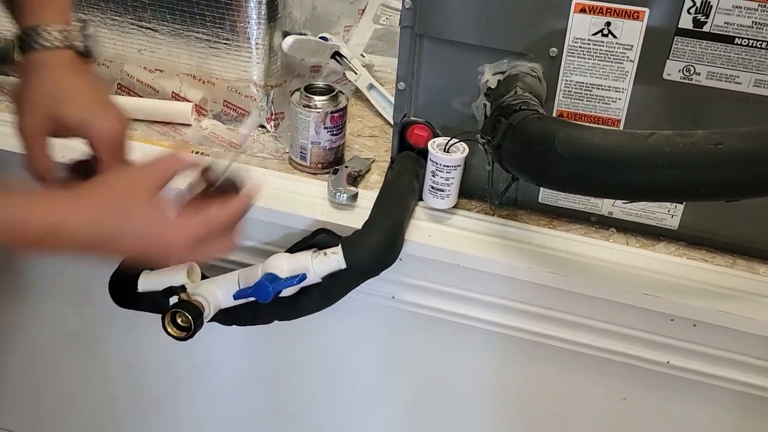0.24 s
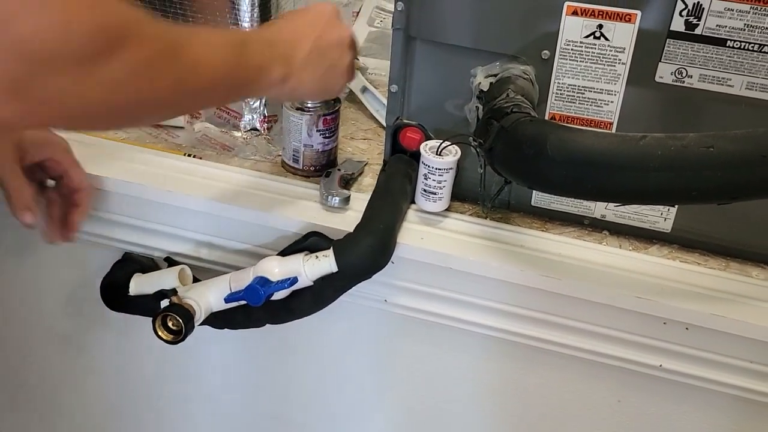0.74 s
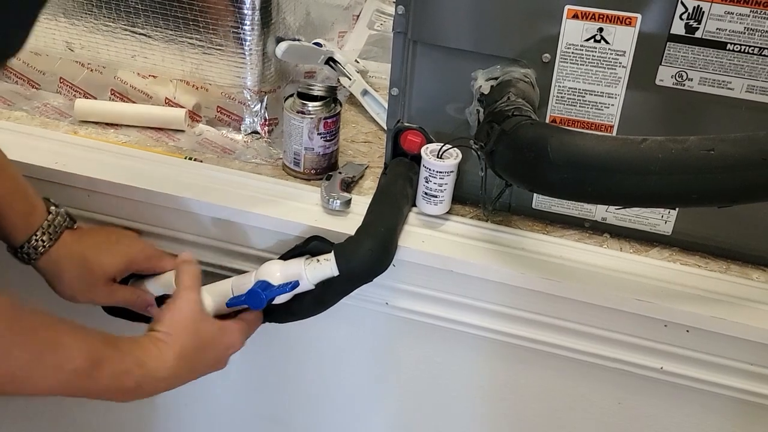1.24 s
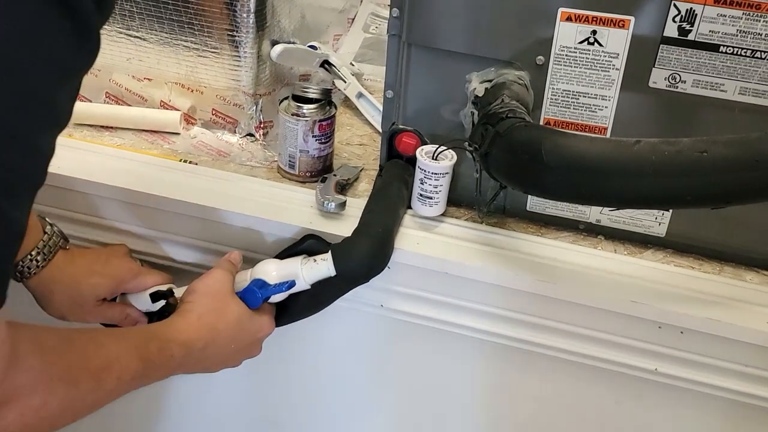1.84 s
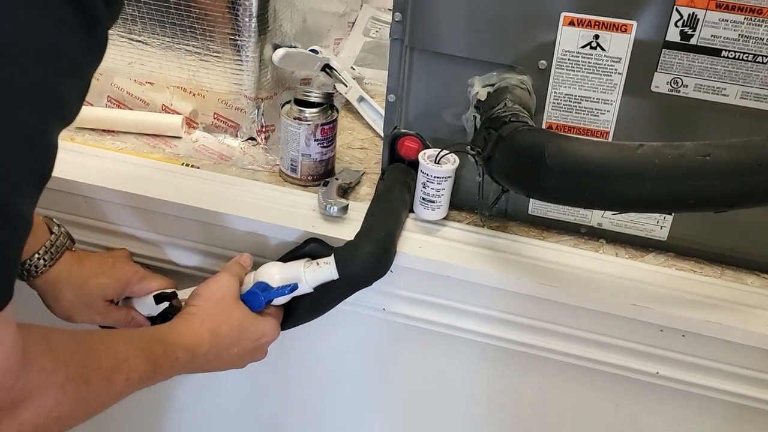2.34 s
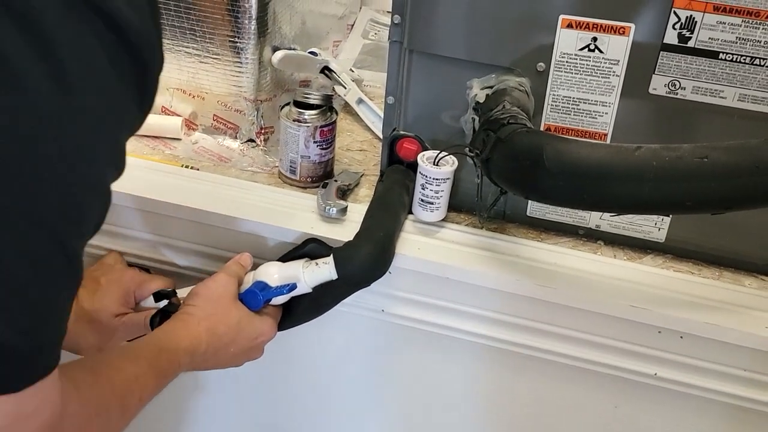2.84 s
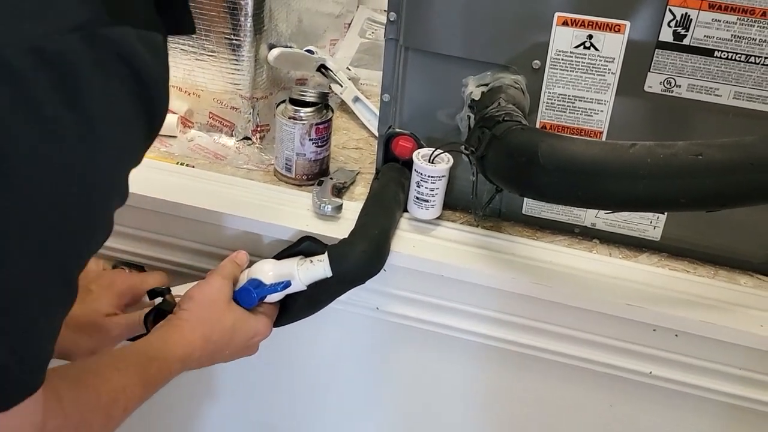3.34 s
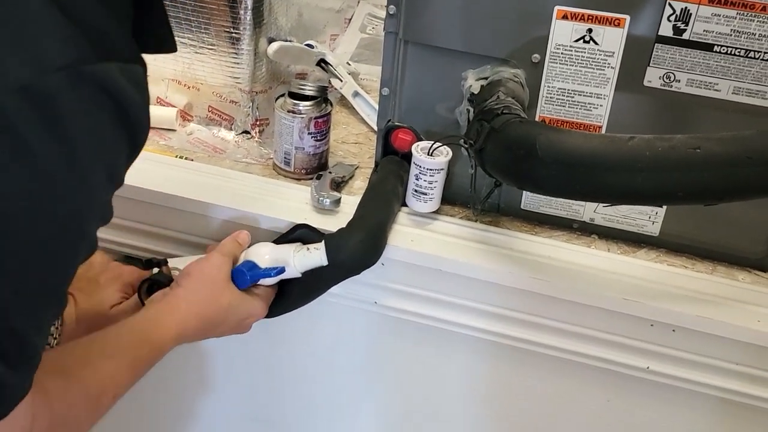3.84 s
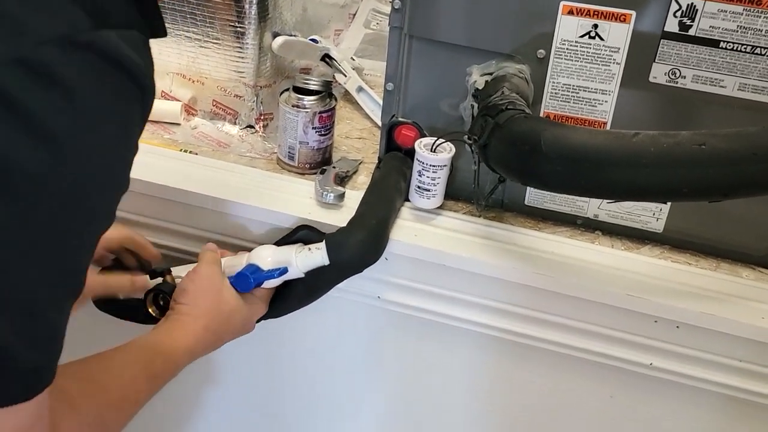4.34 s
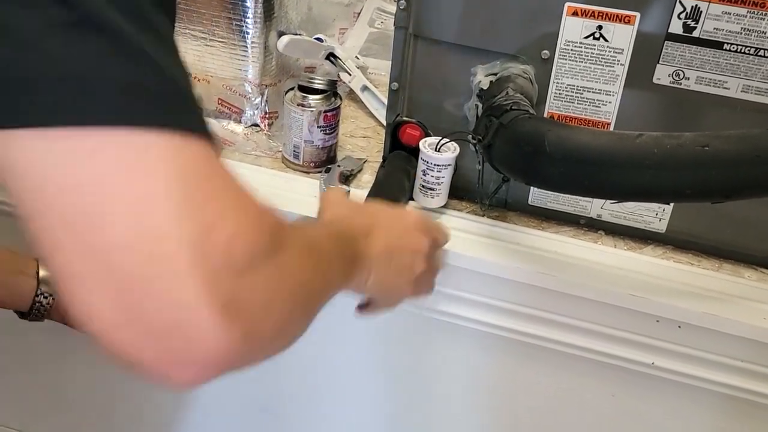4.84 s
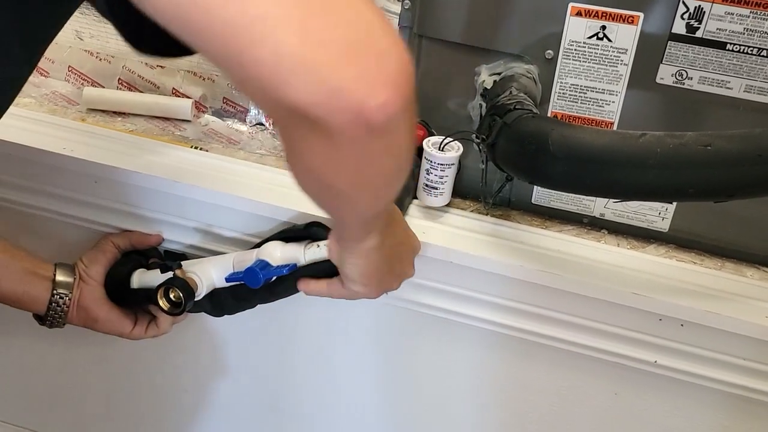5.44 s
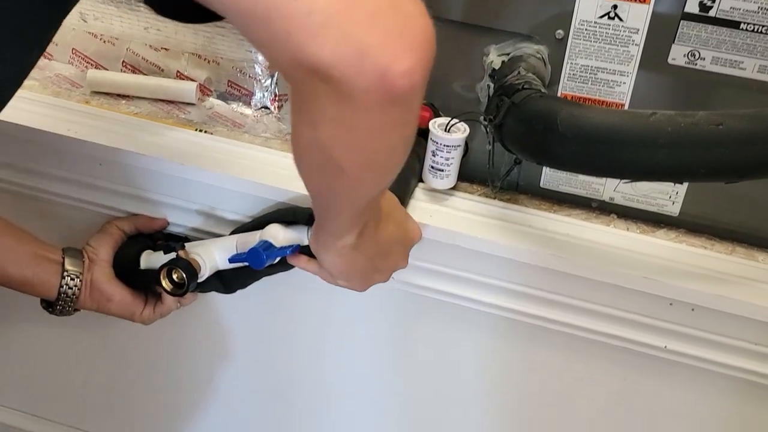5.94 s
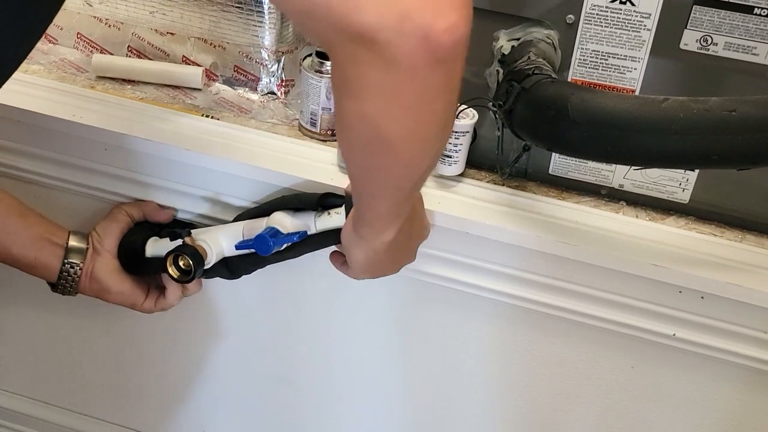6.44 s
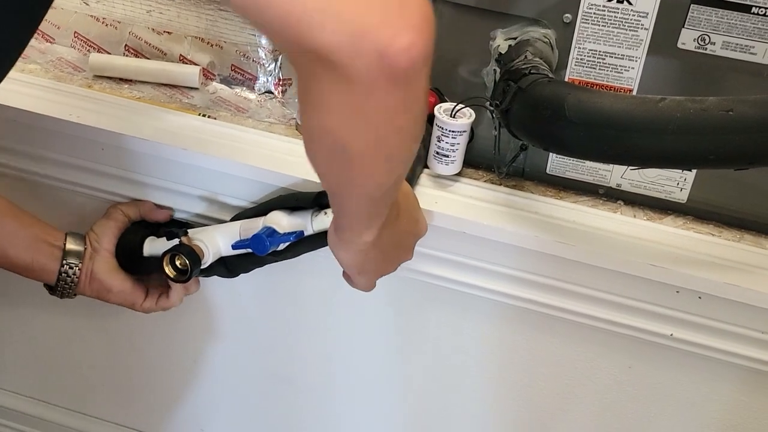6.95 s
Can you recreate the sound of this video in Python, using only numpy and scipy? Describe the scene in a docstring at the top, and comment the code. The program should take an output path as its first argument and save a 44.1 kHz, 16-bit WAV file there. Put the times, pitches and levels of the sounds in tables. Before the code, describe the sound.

Hands work on a plastic drain pipe close to the microphones. A quick run of metallic clacks comes first, followed by dry irregular plastic clicks, small ticks and bassy bumps through a wooden platform. The loudest push snaps hard with a boom. Afterwards only rustling clothes, short rubbery judders, foam scraping and a few light clicks remain, with short room reflections and low air noise.

```python
"""A small hard-walled room: hands fit a plastic drain line close to the microphones, over steady air noise.
Impulsive contacts excite decaying modes: a metal cap clacks onto a cement can and rings; the fitting clicks
and crunches. Each push sways the pipe, knocks the wooden platform and leaves a rumble of shaped noise.
Friction supplies the rest: skin judders on the foam sleeve by stick-slip, foam scrapes as dense crackle,
clothes rustle as fluttering noise. Noise responses supply the room's reflections and a faint late echo."""
import sys
import numpy as np
from scipy import signal
from scipy.fft import rfft, irfft, next_fast_len
from scipy.io import wavfile
from scipy.ndimage import uniform_filter1d

SR = 44100
rng = np.random.default_rng(int(sys.argv[2]) if len(sys.argv) > 2 else 0)


def store_wav(level_fs):
    """Save 16-bit WAV to argv[1]."""
    pcm = np.round(np.clip(np.atleast_2d(level_fs), -1, 1) * 32767)
    wavfile.write(sys.argv[1], SR, pcm.T.astype(np.int16))


N = 317079
TIME = np.arange(N) / SR
AFTER = TIME[:SR // 2]  # time since a blow [s]

# Levels in the tables are relative: each source adds its own gain.
# Cap on the can: (time [s], level [dB], roll-off frequency [Hz], share of tin ring [dB])
CAP_BLOWS = [(.7012, -7, 14200, 4.5), (.7135, -24.5, 2200, 8), (.720, -20.5, 8000, 9.5),
             (.8181, -5, 3700, -37), (.834, -23, 2970, -23), (.9099, -15, 2300, -34),
             (.924, -18.5, 2000, -32)]
# Plastic on plastic: (time [s], level [dB], bass shelf [dB], treble shelf [dB])
CLICKS = [(1.0228, -30.5, -12.5, -21), (1.0586, -37.5, -11, -51), (1.1255, -30, -31, -7.5),
          (1.322, -25.5, -19, -29), (1.386, -47.5, 11.5, -30), (1.759, -19, -2, -19),
          (1.7781, -34, -3, -34), (1.8434, -27.5, -16, -20), (1.8584, -36.5, -4.5, -7),
          (1.8961, -30, -21, -30), (2.0848, -25, -23, -11.5), (2.1038, -28.5, -48, -9.5),
          (2.195, -37, -12, -40), (2.2788, -32, -18, -35), (2.355, -32.5, -9.5, -30),
          (2.3909, -26.5, -20.5, -8), (2.5592, -30.5, -22, -10), (2.928, -38, -1, -25),
          (2.988, -32, -23, -37), (3.2201, -28.5, -52, -14), (3.3845, -34.5, -17, -44),
          (3.5307, -17, -4.5, -18.5), (3.713, -39, -12, -28), (3.8258, -3, -15, -18.5),
          (3.8312, -11, -13, -33), (3.8414, -20, 2.5, 6), (3.8455, -25, -18, -2), (4.0347, -28, -5, -28),
          (4.0604, -21, -1, -18), (4.4573, -36, -23, -32), (4.5164, -38.5, -20, -51),
          (4.8248, -38.5, 0, -8), (5.27, -34.5, -12, -51), (5.3173, -23.5, -37, -61),
          (5.5966, -23, -21, -9), (5.686, -43, -8.5, -30.5), (6.1303, -31, -25, -14)]
# Pushes on the pipe: (time [s], sway level [dB], time to full sway [s], knock on the boards [dB])
PUSHES = [(.154, -54, 0.0052, -45.5), (1.113, -37.5, 0.031, -42), (1.382, -48, 0.039, -47),
          (1.764, -12.5, 0.026, -16.5), (1.883, -25, 0.012, -47), (2.086, -20.5, 0.039, -33.5),
          (2.145, -24, 0.017, -36), (2.386, -25.5, 0.022, -39), (2.489, -44.5, 0.031, -48),
          (2.791, -24.5, 0.022, -32), (2.925, -40, 0.03, -36), (3.198, -35, 0.038, -41),
          (3.531, -20, 0.022, -16.5), (3.691, -37.5, 0.033, -60), (3.824, -18.5, 0.0052, -7.5),
          (3.858, -9, 0.0077, -20), (4.032, -19, 0.007, -24.5), (4.067, -23.5, 0.016, -18.5),
          (4.121, -32.5, 0.039, -49), (4.367, -44.5, 0.035, -55), (4.911, -41, 0.024, -48),
          (5.33, -28.5, 0.021, -42), (5.453, -44.5, 0.037, -68), (5.669, -50, 0.028, -48),
          (6.183, -44, 0.022, -44.5), (6.657, -42, 0.0092, -60), (6.929, -70, 0.0074, -46)]
# Skin juddering on foam:
# (time [s], length [s], first slip rate [Hz], last slip rate [Hz], level [dB], roll-off frequency [Hz])
JUDDERS = [(0.448, 0.048, 266, 213, -53, 302), (0.961, 0.04, 248.5, 161, -44.5, 384),
           (3.118, 0.036, 175, 152, -51.5, 245), (3.455, 0.031, 311, 240, -46, 304),
           (4.562, 0.033, 189.3, 152, -32, 414), (4.596, 0.074, 203.6, 184.5, -47.5, 130),
           (4.811, 0.023, 350, 297, -44, 905), (4.887, 0.0617, 109.8, 82.7, -40, 354),
           (6.538, 0.086, 170.4, 169, -36.5, 4730), (6.595, 0.1, 164.8, 131.7, -37.5, 4700),
           (6.66, 0.016, 213, 176, -38.5, 266), (6.697, 0.025, 168, 136, -69, 224)]
# Foam sleeve scraping: (middle [s], half width [s], level [dB], treble shelf [dB])
SCRAPES = [(1.13, 0.015, -38.5, 10), (1.304, 0.021, -49.5, 9), (1.785, 0.023, -35.5, -10),
           (1.975, 0.015, -59, -7), (2.249, 0.038, -47.5, -6), (2.85, 0.11, -49.5, -6.5),
           (3.231, .03, -40, 0), (3.461, 0.031, -49, -3), (3.818, 0.0086, -29, -29.5),
           (4.065, 0.019, -28, -9), (4.40, 0.055, -54, 11), (4.628, 0.063, -44.5, 8),
           (4.821, 0.041, -46, 15), (5.109, 0.08, -53, 2), (5.345, 0.034, -34.5, 3.5),
           (5.49, 0.039, -48.5, 6.5), (6.19, 0.096, -49, 3), (6.312, 0.086, -53, 5.5),
           (6.408, 0.031, -50, 10.5), (6.543, 0.027, -43.5, -8)]
# Arm movements that rustle the clothes: (start [s], length [s], level [dB])
REACHES = [(0, 0.43, -63), (0.335, 0.23, -56), (0.65, 0.78, -60), (3.893, 0.34, -64.5),
           (4.29, 0.704, -56.5), (5.046, 0.87, -63.5), (6.06, 0.68, -64.5), (6.921, 0.25, -67.5)]

# Modes of the platform boards: (frequency [Hz], level [dB], decay by 60 dB [s])
BOARD_MODES = [(108.2, 8.5, 0.13), (163.4, -5, 0.23), (201, -7.5, 0.16), (214, -3, .12), (284.6, 1, 0.12),
               (328, -3.5, 0.098), (438, -17.5, 0.072), (518, -29.5, 0.39), (611, -11, 0.076),
               (714, -6, 0.11)]
# Modes of the pipe wall: (frequency [Hz], level [dB], decay by 60 dB [s])
PIPE_MODES = [(783, -11.5, 0.074), (1130, -21, .05), (1356, 0, 0.019), (1820, -7, .03), (2450, -9.5, 0.056),
              (2680, -11, .06), (2935, -1.5, 0.034), (3455, -3.5, .03), (3870, -24, .03), (4840, -18, .028),
              (5000, -13, .021)]
# Modes of the cement can: (frequency [Hz], level [dB], decay by 60 dB [s])
TIN_MODES = [(1190, 2.5, 0.051), (1246, 1.5, 0.036), (1348, -8, 0.049), (2590, -0.5, 0.013),
             (3070, -12, 0.034), (3560, -11, 0.044), (3630, 1, 0.021), (5310, -4.5, 0.019),
             (5650, 6.5, 0.0078), (6900, 1, 0.009), (10220, -4.5, 0.027), (11200, -8, 0.037)]
# Reverberation of the small room: (frequency [Hz], decay by 60 dB [s])
ROOM_T60 = [(150, 0.6), (500, 0.26), (1500, 0.22), (4000, 0.17), (8000, 0.22), (15000, 0.17)]

# Spectrum of plastic clicks: (frequency [Hz], gain [dB])
CLICK_COLOUR = [(100, -19.5), (300, -3), (750, 2.5), (1300, -0.5), (1900, -0.5), (2700, -0.5), (4300, -2.5),
                (7000, -3), (10000, -10.5), (15500, -10)]
# Spectrum of the cap's clack: (frequency [Hz], gain [dB])
CAP_COLOUR = [(150, -19), (330, -9.5), (560, -7.5), (850, -5), (1700, -7.5), (2300, -9.5), (3400, -1.5),
              (4600, -13), (6500, -20), (9000, -21), (15000, -19)]
# Spectrum of foam scrapes: (frequency [Hz], gain [dB])
SCRAPE_COLOUR = [(150, -2.5), (500, -11), (1200, -6.5), (2000, -3.5), (3500, -1), (6000, -7.5), (9000, -19),
                 (15500, -18.5)]
# Spectrum of skin judders: (frequency [Hz], gain [dB])
JUDDER_COLOUR = [(60, -14), (170, -0.5), (260, 0), (350, -1.5), (500, -10.5), (850, -10), (1300, -17.5),
                 (2000, -14), (2600, -17.5), (3400, -13.5), (6000, -24), (15000, -24.5)]
# Spectrum of cloth: (frequency [Hz], gain [dB])
RUSTLE_COLOUR = [(100, -8), (300, -14.5), (600, -4.5), (1200, 0.5), (2800, 1), (5000, -5.5), (9000, -11),
                 (15500, -15)]
# Spectrum of the platform's dense thud: (frequency [Hz], gain [dB])
THUD_COLOUR = [(50, 4), (100, 6), (180, -0.5), (290, 5), (430, -6), (750, -7.5), (1300, -15.5),
               (3000, -30.5), (8000, -60)]
# Spectrum of the platform's rumble: (frequency [Hz], gain [dB])
RUMBLE_COLOUR = [(20, -30), (40, 5.5), (60, 6), (110, -1), (180, -7.5), (320, -18), (600, -29),
                 (1500, -27.5), (4000, -54)]
# Spectrum of the air: (frequency [Hz], gain [dB])
AIR_COLOUR = [(25, -4), (65, 1.5), (160, -12), (330, -7), (600, -13.5), (1000, -13.5), (2800, -14.5),
              (6000, -20.5), (10000, -33.5), (15500, -28)]

REACH_ATTACK_S, REACH_RELEASE_S, RESTING_DB = 0.017, 0.07, -72
GRIP_START_S, GRIP_END_S = 0.95, 6.4  # the hands hold the pipe
GRIP_DB, LOOSE_DB = -56.5, -68  # rumble while it is held, and otherwise
RUMBLE_BUILD_S, RUMBLE_DECAY_S = 0.03, 0.081  # the platform after a push
SLOW_SWAY_HZ, STIFFEN_S = 57.74, 0.0085  # limit for a slow shove; shoves near this time swing faster
KNOCK_LAG_S = 0.002986  # the pipe meets the boards just after the push begins
WORKING_START_S, WORKING_END_S = 1.75, 4.5  # the joint is being worked
LATE_T60_S, LATE_DB, LATE_BODY_DB, LATE_DULL_HZ = 0.74, -27, -15, 5000
TOP_HZ = 15900


def undb(db):
    """Level to amplitude: 20 dB is a factor of ten."""
    return 10 ** (np.asarray(db) / 20)


def unit(x):
    """Normalisation of power: an rms of 1."""
    return x / np.sqrt(np.mean(x ** 2) + 1e-24)


def unit_energy(x):
    """Normalisation of energy: a mean of 1 per channel."""
    return unit(x) / np.sqrt(x.shape[-1])


def add(track, s, x):
    """Superposition: x joins the track at s seconds."""
    start = max(int(s * SR), 0)
    track[..., start:start + x.shape[-1]] += x[..., :N - start]


def along(points, hz):
    """Interpolation of (frequency, value) points on a logarithmic frequency axis."""
    f, value = np.transpose(points)
    return np.interp(np.log(hz + 1), np.log(f), value)


def colour(x, points, body_db=0, treble_db=0, dull_hz=SR):
    """Minimum-phase filtering: a spectrum with bass shelf, treble shelf and roll-off, made causal."""
    size = next_fast_len(x.shape[-1] + 4096, True)
    hz = np.fft.rfftfreq(size, 1 / SR)
    bass_shelf = body_db / (1 + (hz / 1300) ** 4)
    treble_shelf = treble_db * (1 - 1 / (1 + (hz / 6500) ** 6))
    gain = undb(along(points, hz) + bass_shelf + treble_shelf)
    roll_off = np.log1p((hz / dull_hz) ** 4) / 2
    # folding the cepstrum onto positive time gives the minimum phase
    cepstrum = irfft(np.log(gain) - roll_off, size)
    cepstrum[1:size // 2] *= 2
    cepstrum[size // 2 + 1:] = 0
    return irfft(rfft(x, size) * np.exp(rfft(cepstrum)), size)[..., :x.shape[-1]]


def ring(modes, scatter_db=2):
    """Modal decay: each blow lands elsewhere and shares its energy differently among the modes."""
    hz, db, t60 = np.transpose(modes)[:, :, None]
    level_db = db + scatter_db * rng.standard_normal(hz.shape)
    size = undb(level_db) * rng.choice([-1, 1], hz.shape)
    decay = np.exp(-np.log(1000) * AFTER / t60)
    return np.sum(size * np.sin(2 * np.pi * hz * AFTER) * decay, axis=0)


def diffuse(size, apart_hz=650):
    """Diffuse-field coherence: noise much alike at both ports in the bass, unrelated in the treble."""
    mid, side = rfft(rng.standard_normal((2, size)))
    alike = 0.94 / (1 + (np.fft.rfftfreq(size, 1 / SR) / apart_hz) ** 4)
    opposed = np.array([[1], [-1]]) * side * np.sqrt(1 - alike)
    return irfft(mid * np.sqrt(1 + alike) + opposed, size)


def grains(size, per_s, spread_db):
    """Asperity contact: random tiny catches of a rough surface, many faint and a few strong."""
    strength = undb(spread_db * np.minimum(rng.exponential(size=size), 5))
    caught = rng.random(size) < per_s / SR
    return unit(rng.standard_normal(size) * strength * caught)


def walk(rate):
    """Slow random drift: interpolated normal knots at a rate [Hz], with a spread near 1."""
    knots = rng.standard_normal(int(rate * N / SR) + 2)
    return np.interp(TIME * rate, np.arange(len(knots)), knots)


def slip(length_s, snap=0.4):
    """Contact release: a snap, then an exponentially dying crunch of micro-slips."""
    force = unit_energy(grains(len(AFTER), 25000, 0.57) * np.exp(-AFTER / max(length_s, 1e-4)))
    force[0] += snap
    return unit_energy(force)


def crackle(size, per_s, catch_db):
    """Sliding friction: a fine hiss with separate small catches below the treble."""
    low_pass = signal.butter(2, 5500, fs=SR, output="sos")
    catches = signal.sosfilt(low_pass, grains(size, per_s, 2.2))
    return unit(rng.standard_normal(size) + undb(catch_db) * unit(catches))


def room(x, near_db, tail_db, near_s=0.0067, build_s=0.0034):
    """Room response at two ports: direct from the left, nearby panels, a tail decaying by band."""
    size = len(AFTER)
    noise = rfft(diffuse(size))
    hz, t60 = np.transpose(ROOM_T60)
    tail = 0
    for band, band_t60 in zip(np.eye(len(hz)), t60):
        weight = along(np.c_[hz, band], np.fft.rfftfreq(size, 1 / SR))
        tail = tail + irfft(noise * weight, size) * np.exp(-np.log(1000) * AFTER / band_t60)
    response = undb(tail_db) * unit_energy(tail * (1 - np.exp(-AFTER / build_s)))
    response += undb(near_db) * unit_energy(diffuse(size) * np.exp(-AFTER / near_s))
    response[[0, 1], [0, 4]] += 1  # direct sound, four samples later on the right
    return signal.fftconvolve(x[None], unit_energy(response), axes=1)[:, :N]


def house(x):
    """Late reverberation: a faint, dull and longer echo from beyond the small room."""
    noise = colour(diffuse(len(AFTER)), SCRAPE_COLOUR, body_db=LATE_BODY_DB, dull_hz=LATE_DULL_HZ)
    tail = noise * np.exp(-np.log(1000) * AFTER / LATE_T60_S)
    return undb(LATE_DB) * signal.fftconvolve(x, unit_energy(tail), axes=1)[:, :N]


def air(level_db=-63):
    """Stationary diffuse noise: steady air with a fixed spectrum."""
    return undb(level_db) * unit(colour(diffuse(N), AIR_COLOUR))


def rustle(flutter_db=2, catches_per_s=200, catch_db=-6):
    """Modulated friction noise: cloth and skin rustle unevenly; each reach swells, holds and fades."""
    motion = np.full(N, undb(RESTING_DB))
    for s, length_s, db in REACHES:
        swell = np.clip((TIME - s) / REACH_ATTACK_S, 0, 1)
        fade = np.exp(-np.maximum(TIME - s - length_s, 0) / REACH_RELEASE_S)
        motion = np.hypot(motion, undb(db) * swell * fade)
    catches = room(crackle(N, catches_per_s, catch_db=4.5), near_db=9.5, tail_db=2.5)
    cloth = diffuse(N) + undb(catch_db) * catches
    return unit(colour(cloth, RUSTLE_COLOUR)) * motion * undb(flutter_db * walk(35))


def rumble(gain_db=-13, growth=0.99):
    """Addition of noise powers: the held pipe rumbles softly; each push shakes the platform for a while."""
    gripped = (TIME > GRIP_START_S) & (TIME < GRIP_END_S)
    power = uniform_filter1d(undb(np.where(gripped, GRIP_DB, LOOSE_DB)) ** 2, SR // 20)
    shake = (1 - np.exp(-AFTER / RUMBLE_BUILD_S)) * np.exp(-AFTER / RUMBLE_DECAY_S)
    for s, db, _, _ in PUSHES:
        add(power, s, (undb(growth * db + gain_db) * shake) ** 2)
    return unit(colour(rng.standard_normal(N), RUMBLE_COLOUR)) * np.sqrt(power)


def sway(steep=1.24, overtone_db=-15):
    """Damped oscillation: the held pipe swings briefly, stopped by the hands; sharp shoves swing faster."""
    out = np.zeros(N)
    for s, db, swell_s, _ in PUSHES:
        age = AFTER / swell_s
        swing_hz = SLOW_SWAY_HZ * np.hypot(1, STIFFEN_S / swell_s)
        turn = 2 * np.pi * swing_hz * AFTER
        swing = np.sin(turn) + undb(overtone_db) * np.sin(1.823 * turn)
        envelope = age * np.exp((1 - age ** steep) / steep)  # peaks at swell_s
        add(out, s, undb(db) * swing * envelope)
    return out


def platform(boom_db=-7, contact_s=0.0068, thud_db=18, thud_s=0.018):
    """Impact excitation: boards driven by the pipe boom in a few clear modes over a dense thud."""
    out = np.zeros(N)
    for s, _, _, db in PUSHES:
        thud = unit_energy(colour(slip(thud_s), THUD_COLOUR))
        boom = ring(BOARD_MODES) * (1 - np.exp(-AFTER / contact_s))
        add(out, s + KNOCK_LAG_S, undb(db) * (undb(boom_db) * boom + undb(thud_db) * thud))
    return out


def judders(gain_db=-1, grit=0.76, grit_share=0.44):
    """Stick-slip oscillation: skin on foam gives a pulse and a puff of grit at each slip."""
    out = np.zeros(N)
    high_pass = signal.butter(2, 1300, "high", fs=SR, output="sos")
    for s, length_s, first_hz, last_hz, db, dull_hz in JUDDERS:
        size = int(length_s * SR)
        slip_hz = np.linspace(first_hz, last_hz, size) * (1 + 0.04 * walk(160)[:size])
        cycles = np.cumsum(slip_hz) / SR
        # one pulse per whole cycle, less the mean
        pulses = unit(np.diff(np.floor(cycles), prepend=0) - np.diff(cycles, prepend=0))
        puffs = unit(rng.standard_normal(size) * np.exp(-(cycles % 1) / grit_share))
        puffs = signal.sosfilt(high_pass, puffs)
        force = (pulses + grit * puffs) * signal.windows.tukey(size, 0.7)
        rub = colour(np.pad(force, (0, 2048)), JUDDER_COLOUR, dull_hz=dull_hz)
        add(out, s, undb(db + gain_db) * unit_energy(rub) * np.sqrt(size))
    return out


def cap(gain_db=4, ring_db=1):
    """Impact and modal decay: the metal cap clacks onto the can, which rings briefly."""
    out = np.zeros(N)
    for s, db, dull_hz, tin_db in CAP_BLOWS:
        clack = unit_energy(colour(slip(0.0024), CAP_COLOUR, dull_hz=dull_hz))
        tin = undb(tin_db + ring_db) * unit_energy(ring(TIN_MODES))
        add(out, s, undb(db + gain_db) * (clack + tin))
    return out


def fitting(gain_db=25, ring_db=-15, body_db=4, treble_db=7, slip_s=0.0023, strain_s=0.0043, strain_db=-14):
    """Strain release: the joint creaks increasingly, then gives way with a crack that rings the pipe wall."""
    out = np.zeros((2, N))
    lead = SR // 20
    for s, db, body, treble in CLICKS:
        strain = unit_energy(grains(lead, 7200, 0.69) * np.exp(-AFTER[:lead] / strain_s))[::-1]
        crack = slip(slip_s * undb(0.33 * (db + 22.5)))  # harder pushes slip for longer
        crack = crack + undb(ring_db) * unit_energy(ring(PIPE_MODES))
        force = np.r_[undb(strain_db) * strain, crack]
        click = colour(force[:SR // 5], CLICK_COLOUR, body + body_db, treble + treble_db)
        # hands and body keep moving, so every click meets different reflections
        heard = room(click, near_db=4.5, tail_db=1.5, near_s=0.0053)
        add(out, s - lead / SR, undb(db + gain_db) * heard)
    return out


def scrapes(gain_db=-1, catches_per_s=400, catch_db=1, bright_db=6.5):
    """Sliding friction: foam over pipe and wood swells in dense crackle, each with its own reflections."""
    out = np.zeros((2, N))
    middle = AFTER.mean()
    for s, width_s, db, treble_db in SCRAPES:
        rub = crackle(len(AFTER), catches_per_s, catch_db)
        rub = unit(colour(rub, SCRAPE_COLOUR, treble_db=treble_db + bright_db))
        swell = undb(db + gain_db) * np.exp(-((AFTER - middle) / width_s) ** 2)
        add(out, s - middle, room(rub * swell, near_db=4.5, tail_db=-2.5))
    return out


def ticks(per_s=14, tick_db=-33, spread_db=3, body_db=1, treble_db=-22):
    """Random micro-slips: faint ticks at random times while the joint is being worked."""
    working = (TIME > WORKING_START_S) & (TIME < WORKING_END_S)
    strength = undb(tick_db + spread_db * rng.uniform(-1.1, 1, N))
    catches = working * (rng.random(N) < per_s / SR) * strength
    force = signal.fftconvolve(catches, slip(0.003))[:N]
    return colour(force, CLICK_COLOUR, body_db, treble_db)


def scene(port_radians=0.23):
    """Superposition: handling in the room, air, and long bass waves nearly in phase at both ports."""
    handling = rustle() + room(judders(), near_db=3, tail_db=-4.5) + room(cap(), near_db=4, tail_db=3)
    handling += fitting() + scrapes() + room(ticks(), near_db=-6, tail_db=-9)
    # the analytic signal lets the bass be turned in phase, oppositely at each port
    boom = signal.hilbert(rumble() + sway() + platform(), next_fast_len(N))[:N]
    bass = np.real(boom * np.exp(1j * port_radians * np.array([[1], [-1]])))
    return handling + house(handling) + bass + air()


def record(dry):
    """Band limitation: the deepest bass is rolled off and the top cut steeply."""
    high_pass = signal.butter(2, 24, "high", fs=SR, output="sos")
    low_pass = signal.ellip(8, 0.2, 70, TOP_HZ, fs=SR, output="sos")
    return signal.sosfilt(low_pass, signal.sosfilt(high_pass, dry))


dry = scene()
out = record(dry)
store_wav(out)
```